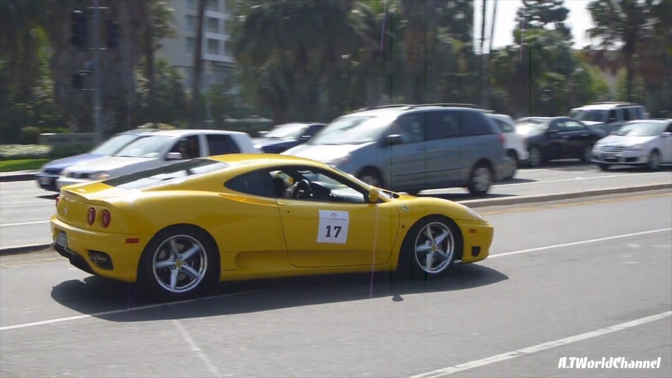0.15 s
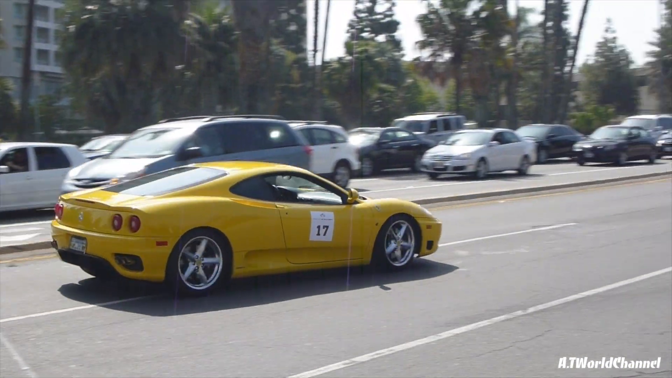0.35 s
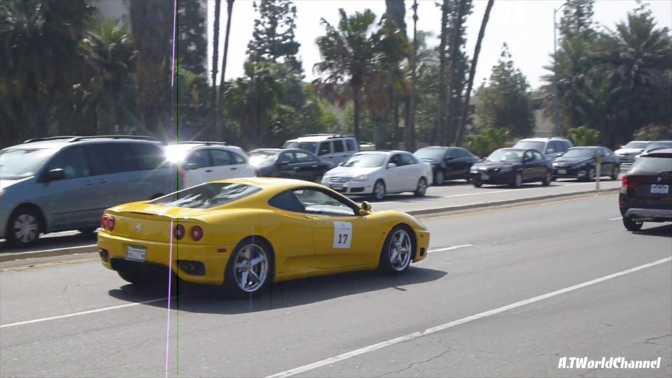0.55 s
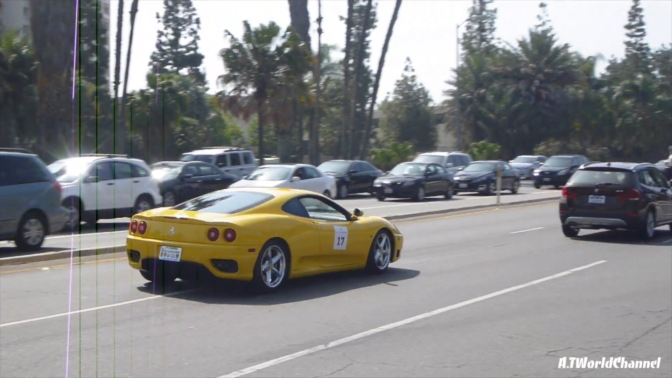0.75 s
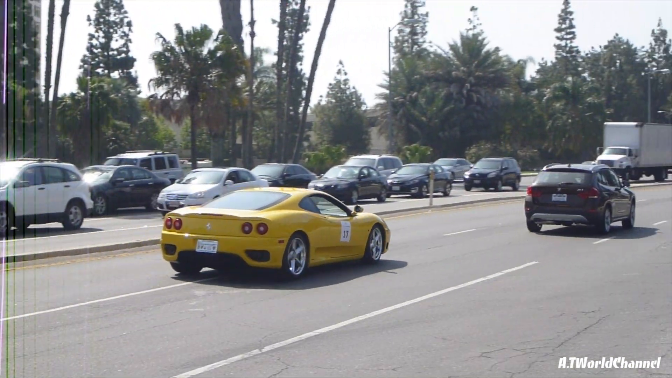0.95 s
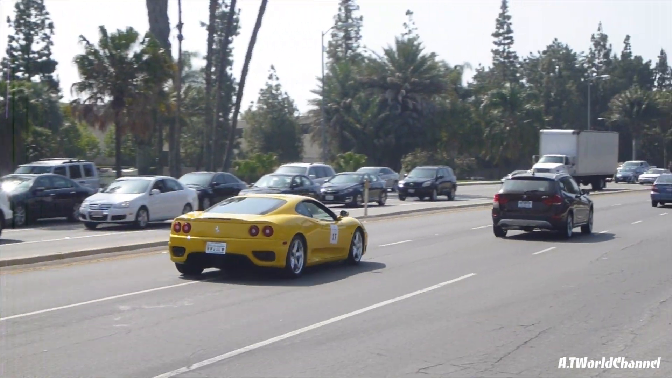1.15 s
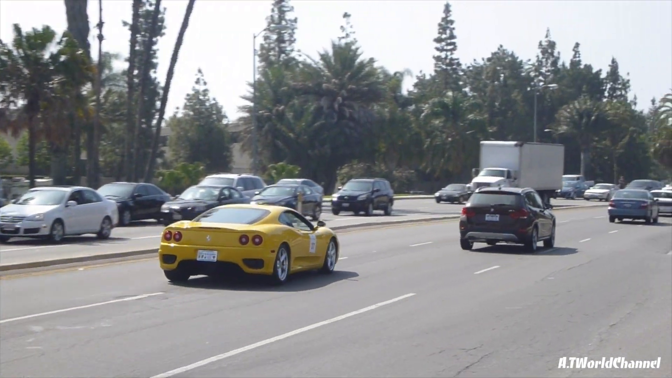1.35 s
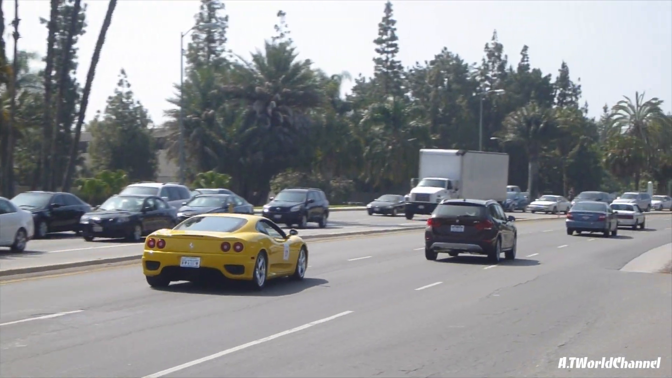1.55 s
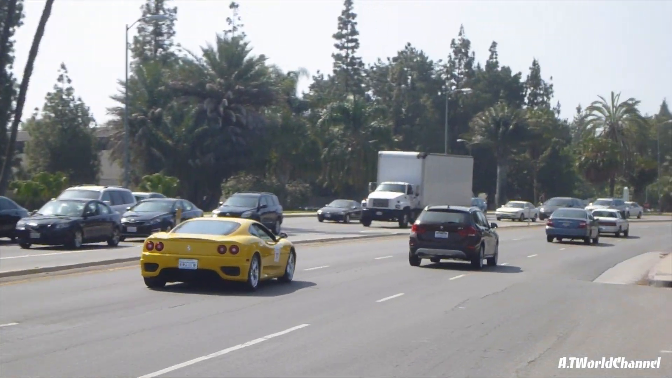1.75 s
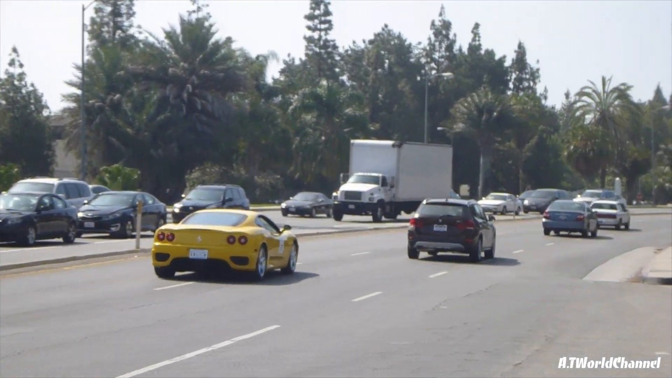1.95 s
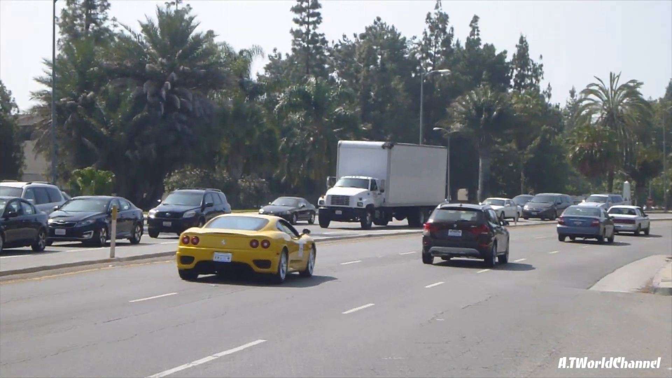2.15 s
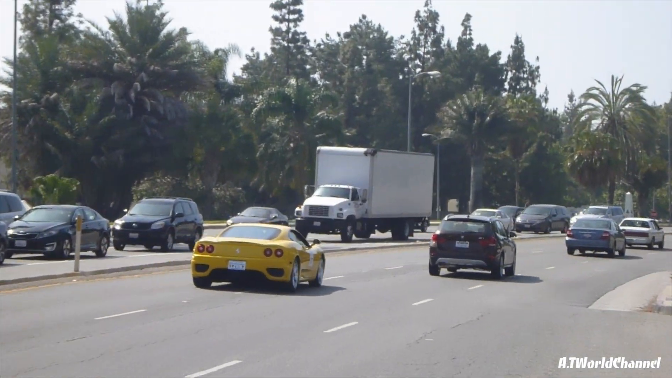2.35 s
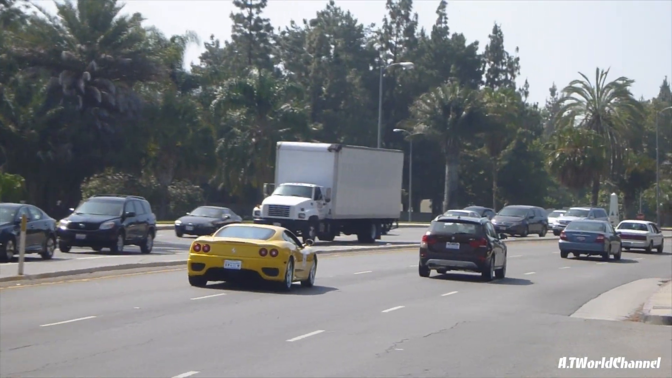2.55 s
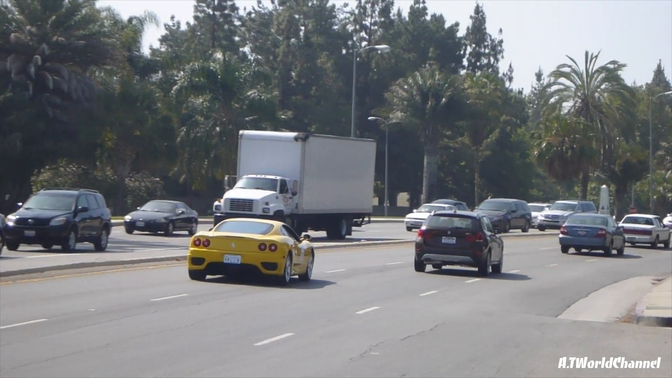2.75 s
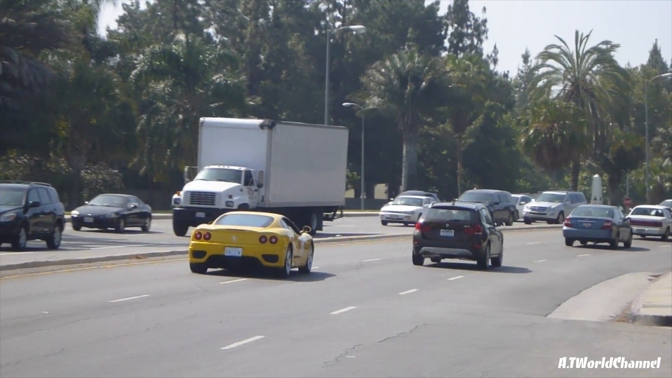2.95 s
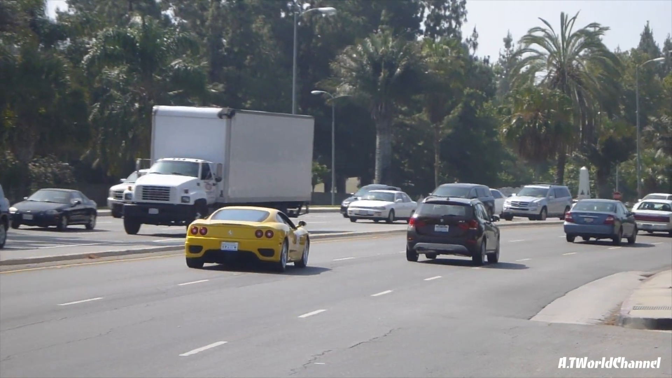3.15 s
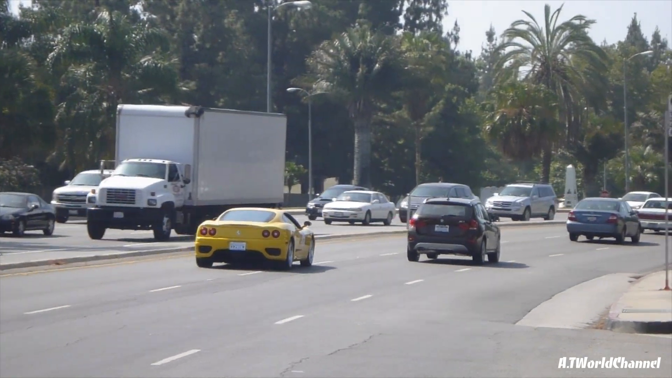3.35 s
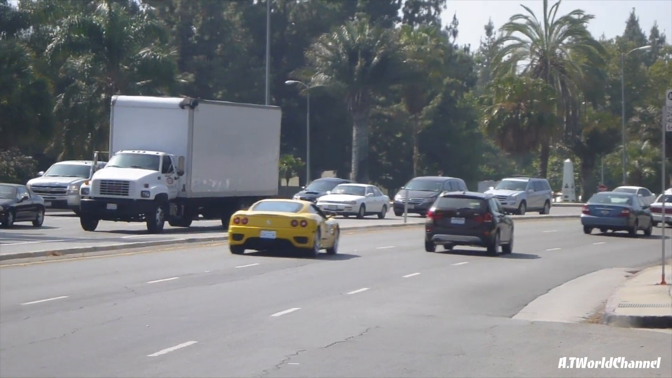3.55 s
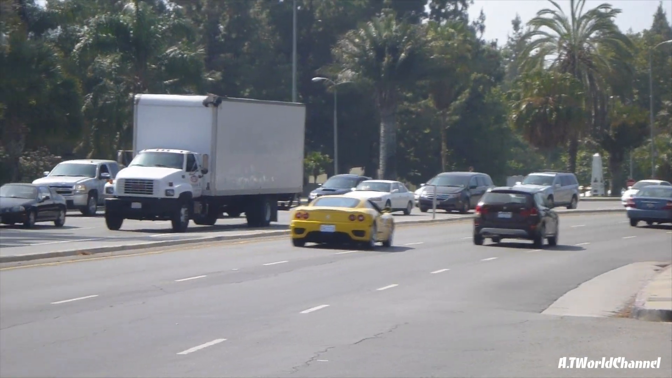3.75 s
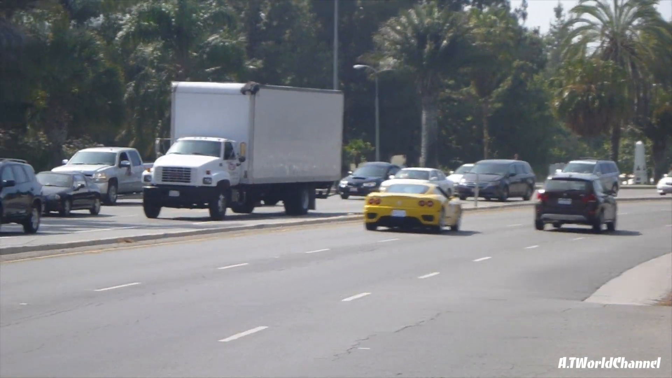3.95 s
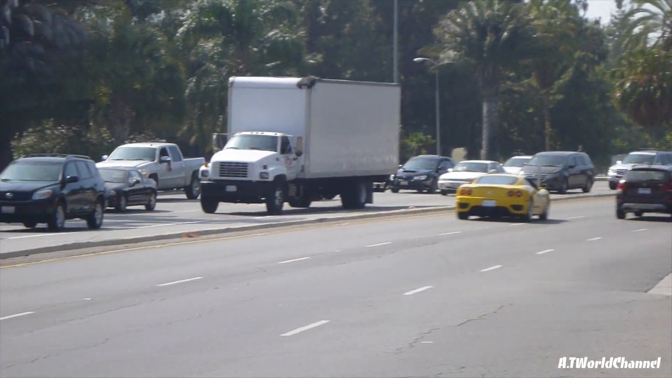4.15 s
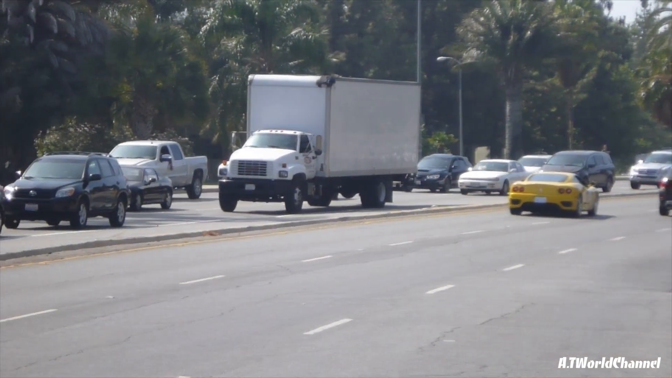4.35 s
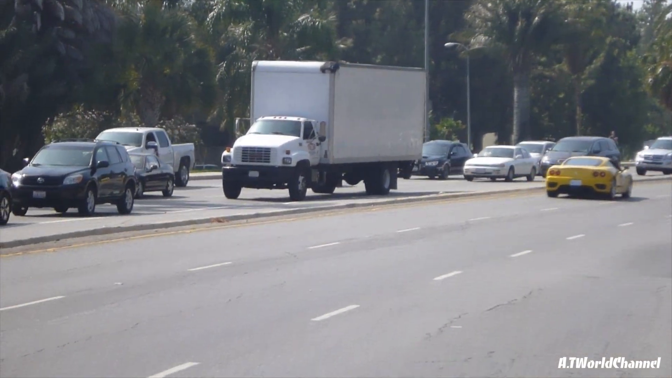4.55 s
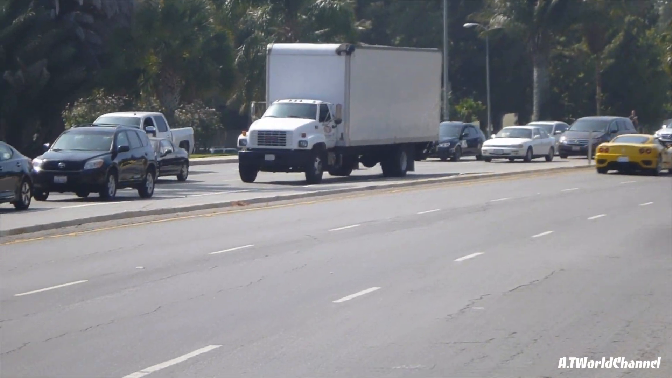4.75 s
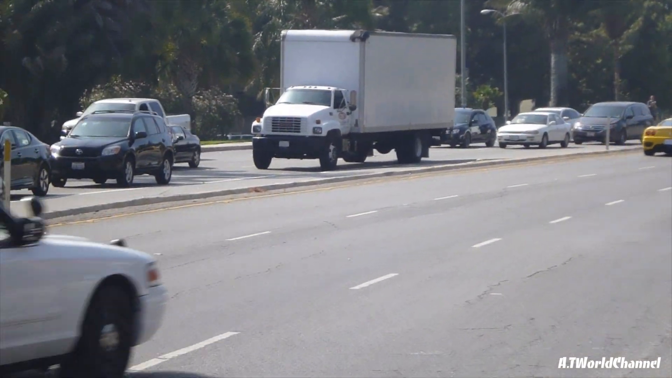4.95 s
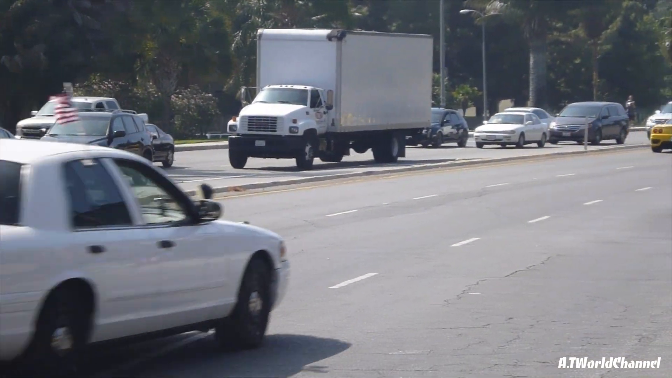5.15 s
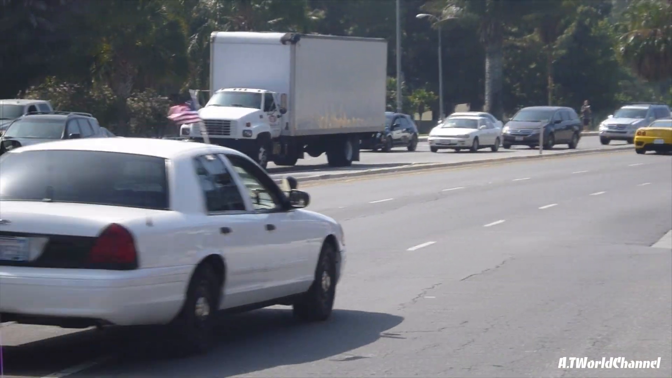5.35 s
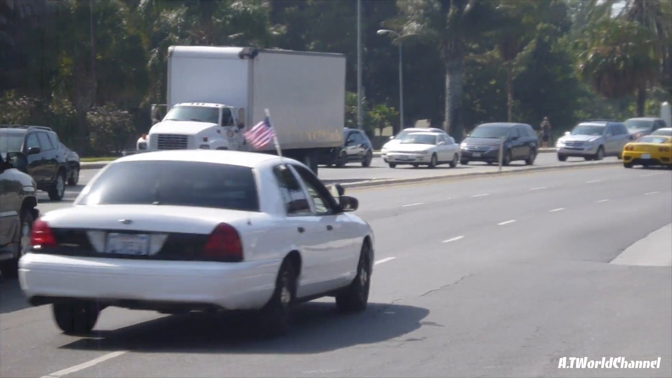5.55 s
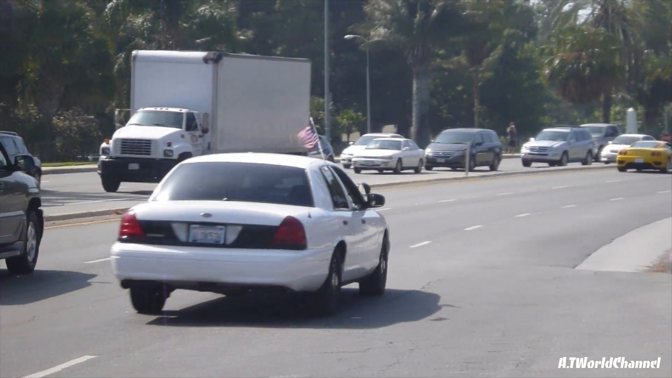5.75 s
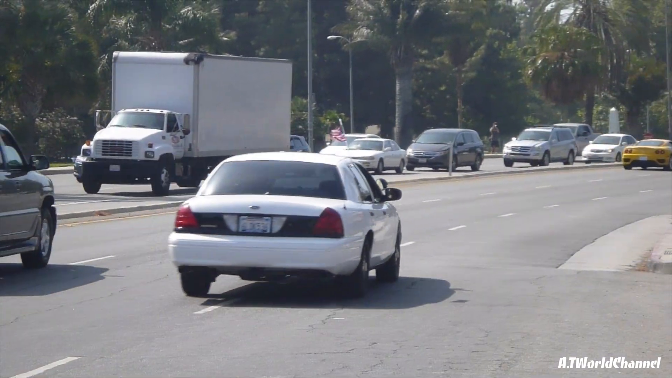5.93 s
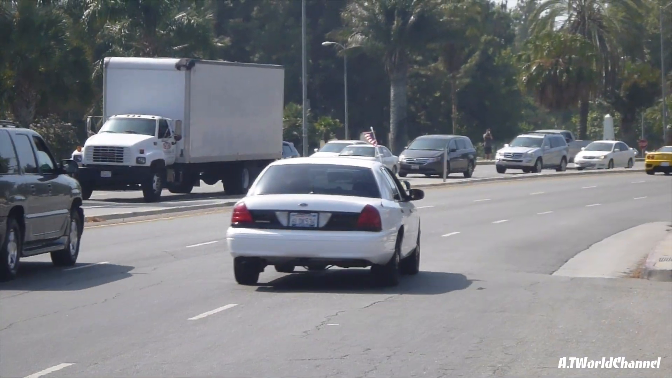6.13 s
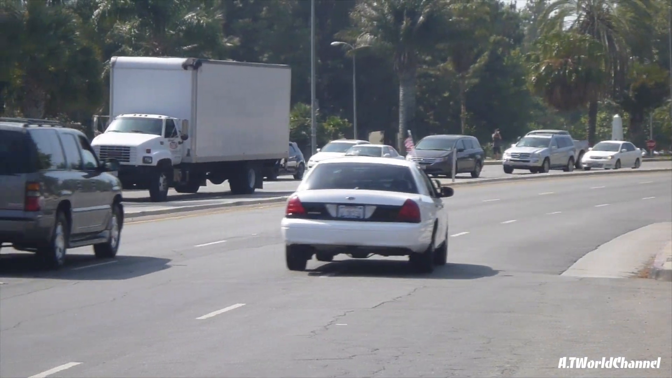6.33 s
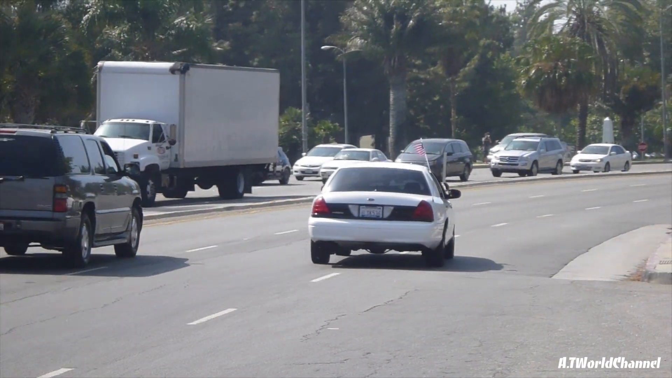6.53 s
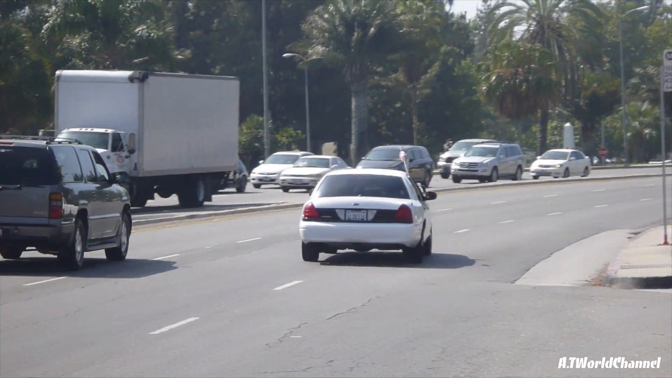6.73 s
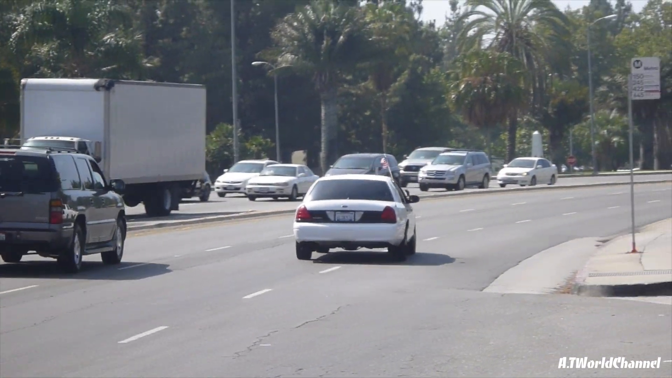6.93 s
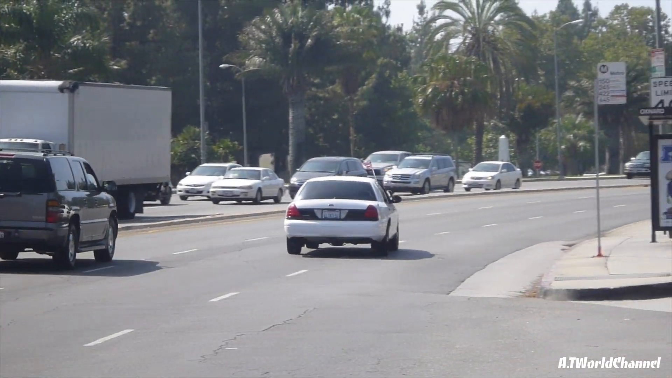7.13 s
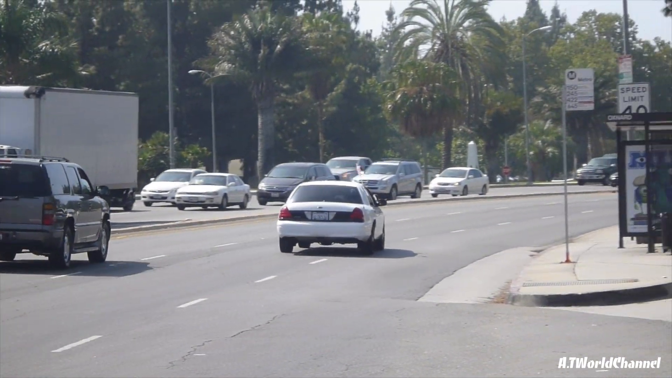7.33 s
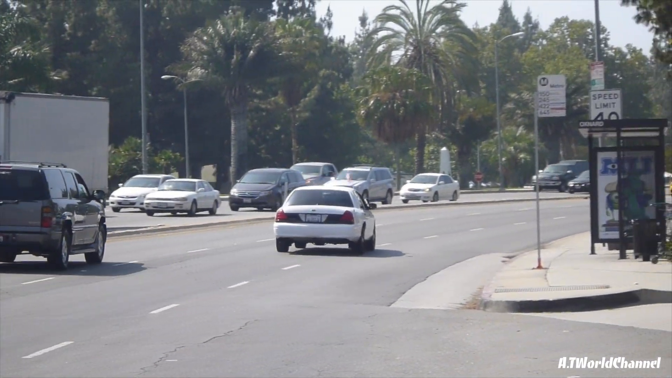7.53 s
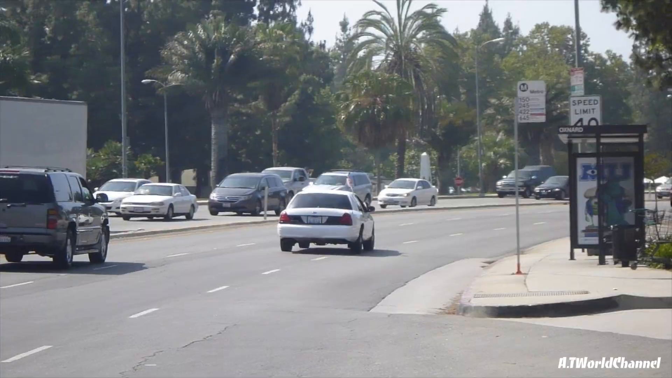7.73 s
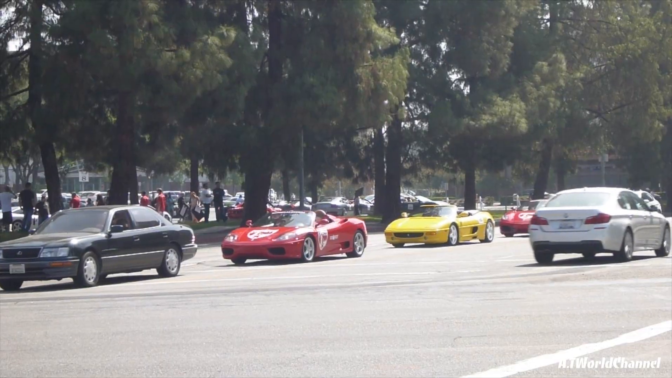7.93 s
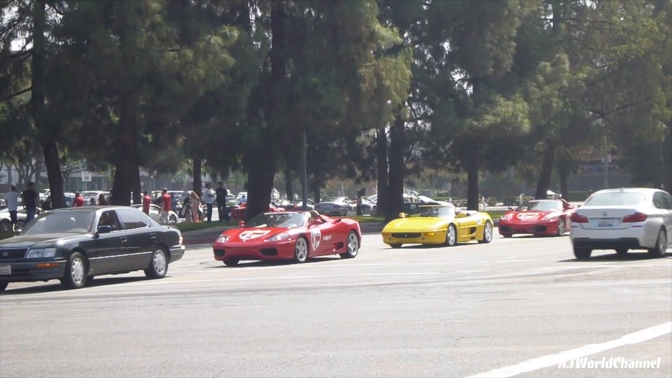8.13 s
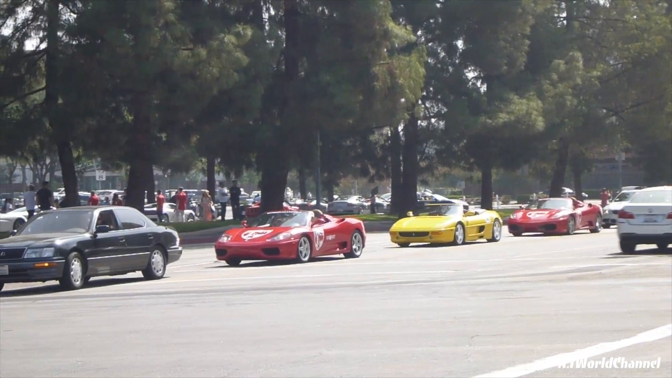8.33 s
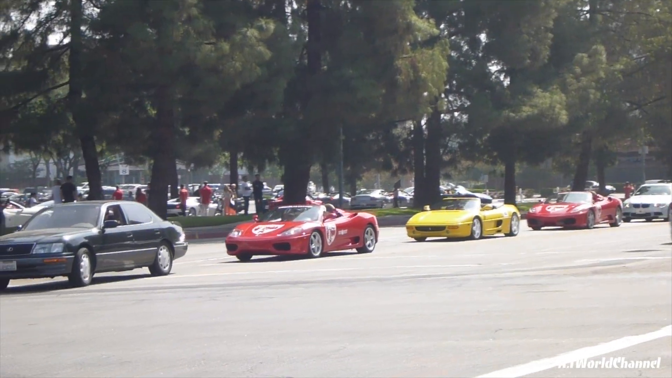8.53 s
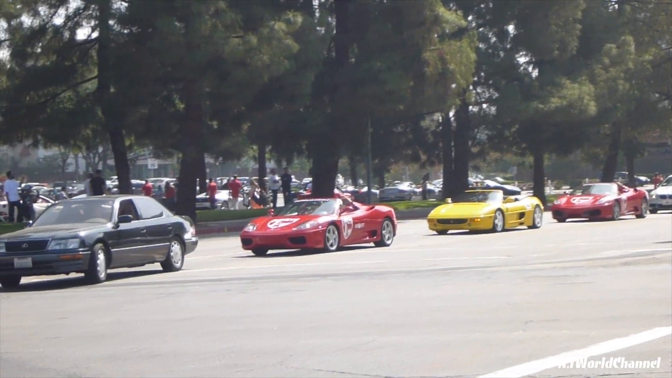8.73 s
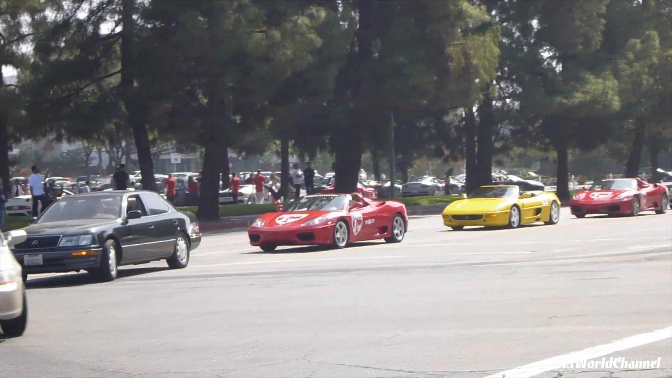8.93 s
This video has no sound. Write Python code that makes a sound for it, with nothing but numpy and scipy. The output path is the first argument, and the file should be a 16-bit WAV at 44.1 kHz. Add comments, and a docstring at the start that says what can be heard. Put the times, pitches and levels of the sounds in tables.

```python
"""A wide street at a junction: cars pull away and pass a camcorder, then a queue grumbles across the road. A
flat-plane V8 coupe winds up in first gear; a burbling cross-plane V8 changes up; a saloon and a last car
follow. Engines are sums of sinusoidal orders locked to a shaft angle; exhaust gas and tyres are coloured noise.
The passing cars have a diffuse street echo. After 33 ms of silence the scene changes to a queue of sports cars
at low revs."""
import sys
import numpy as np
from scipy import signal
from scipy.fft import rfft, irfft, next_fast_len
from scipy.io import wavfile
from scipy.ndimage import uniform_filter1d

SR = 44100
rng = np.random.default_rng(int(sys.argv[2]) if len(sys.argv) > 2 else 0)


def pcm_store(signal):
    """Save signal as 16-bit PCM."""
    levels = np.round(np.clip(np.atleast_2d(signal), -1, 1) * 32767)
    wavfile.write(sys.argv[1], SR, levels.astype(np.int16).T)


N = 396018
TIME = np.arange(N) / SR

# one long pull in first gear: [t/s, crankshaft f/Hz]
COUPE_REVS = [(0, 78.9), (.29, 85.4), (.37, 83.6), (.54, 87.5), (1.12, 97.2), (1.21, 101.4), (1.36, 103.2),
              (2.03, 121.2), (2.7, 136.9), (3.37, 153.4), (4.55, 174.5)]
# it opens up, then draws away: [t/s, strong-order level/dB, weak-order level/dB]
COUPE_LEVEL = [(0, -15, -30.5), (.3, -17, -31), (.9, -14, -25.5), (1.55, -14, -28), (2.0, -17, -23),
               (2.6, -14.5, -26.5), (3.15, -13.5, -27.5), (3.45, -21.5, -31), (3.95, -18.5, -38.5),
               (4.55, -25.5, -43.5)]
# strong orders: [multiple of the crankshaft rate, relative level/dB]
COUPE_ORDERS = [(2, 2.3), (3, -12.5), (4, 1.4), (5, -8.5), (6, -4), (7, -9.4)]
# exhaust resonances through which the strong orders sweep: [f/Hz, width/Hz, level/dB]
COUPE_MODES = [(165.1, 14, -9), (234, 18, -5), (266.5, 38, -0.4), (318.8, 31, 0.8), (375, 37, 2.5),
               (398, 28, 3), (451.6, 36, -0.6), (528, 55, -3.1), (576, 34, -4), (616.7, 51, 1.1),
               (648, 63, 4.5), (740, 51, -5.5), (818, 88, -2.8)]
# exhaust colour of the weak orders: [f/Hz, relative level/dB]
COUPE_PIPE = [(80, -20.5), (150, -12.5), (240, 6.5), (310, -8.5), (400, -1), (520, 11), (690, 7),
              (800, -2.5), (880, -3.5), (970, -10), (1080, -6), (1180, -2), (1290, -4), (1500, -16),
              (1900, -15.5), (3000, -25.5)]
# single orders howl out while the car is close: [t/s, multiple of the crankshaft rate, half length/s, boost/dB]
COUPE_HOWLS = [(0.3, 6, 0.12, 10), (0.565, 6, 0.21, 9.5), (0.549, 3, 0.48, 8.5), (.91, 5, .15, 11),
               (1.208, 6, 0.13, 7), (1.534, 6, 0.16, 7), (1.948, 7, 0.2, 6.5)]
# colour of the rasp: [f/Hz, relative level per Hz/dB]
COUPE_RASP = [(950, -20), (1130, -0.5), (1350, -1), (1600, -16), (1950, -7), (2250, -19.5), (3000, -38.5)]
RASP_DB, RASP_PULSING = -2.5, 0.2  # level over the weak orders; depth of the firing puffs
# the pipes turn away between these times and lose their top
LEAVING_S, DULL_ABOVE_HZ, DULL_DB_PER_OCTAVE = (3.07, 3.3), 340, 13


def coupe():
    """Order resonance: flat-plane V8 orders bloom at exhaust modes, over a pulsing rasp. Also gives its throb."""
    t = span(COUPE_REVS)
    crank_hz, = curves(COUPE_REVS, t)
    strong_db, weak_db = curves(COUPE_LEVEL, t)
    angle = crank(crank_hz, t, jitter=.0025)
    flutter_db = np.interp(t, [2.6, 3.4], [.9, 2.6])  # a far car flutters more
    dull_db = DULL_DB_PER_OCTAVE * np.interp(t, LEAVING_S, [0, 1])

    orders = np.zeros(len(t))
    for k, order_db in COUPE_ORDERS:
        order_hz = k * crank_hz
        howl_db = sum(db * bloom(t, s, half) for s, which, half, db in COUPE_HOWLS if which == k)
        loss_db = dull_db * np.log2(np.maximum(order_hz / DULL_ABOVE_HZ, 1))
        level_db = strong_db + order_db + howl_db - loss_db
        orders += resonances(COUPE_MODES, order_hz) * tone(angle, t, level_db, flutter_db, order=k)
    for k in [1, *range(8, 15)]:
        high_db = -5 if k > 8 else 0
        orders += overtone(angle, t, weak_db + high_db + along(COUPE_PIPE, k * crank_hz), order=k)

    throb = placed(np.cos(angle) + np.cos(2 * angle), t)
    puffs = 1 + RASP_PULSING * throb
    rasp = placed(amp(weak_db + RASP_DB), t) * puffs * rush(COUPE_RASP, patchy_db=-1.9)
    return placed(orders, t) + rasp, throb


# the clutch bites, it pulls, changes up and pulls again: [t/s, firing f/Hz]
BURBLER_REVS = [(3.1, 130.3), (3.4, 140.8), (3.77, 187.8), (4.35, 218), (4.9, 234.6), (5.75, 272.3),
                (6.38, 300), (6.85, 197.2), (7.78, 211.8)]
# its throttle: [t/s, firing-tone level/dB, uneven-beat level/dB]
BURBLER_LEVEL = [(3.1, -30, -40), (3.5, -24.5, -35), (3.8, -19.5, -32), (4.4, -20, -27.5),
                 (4.85, -20.5, -28.5), (5.4, -28, -28), (5.9, -17, -30.5), (6.3, -26, -28.5),
                 (6.6, -22.5, -35), (7.78, -30.5, -38.5)]
# exhaust colour: [f/Hz, relative level/dB]
BURBLER_PIPE = [(68, -27), (88, -13), (115, -20), (150, -8), (190, 0), (240, -4.5), (290, 2), (325, -3),
                (365, 5), (420, -18), (510, -9.5), (630, 0), (750, 3), (850, 3), (950, -22.5), (1600, -18)]
# strength of the cross-plane beat: [multiple of the four-stroke cycle rate, relative level/dB]
BURBLER_BEAT = [(3, 1), (4, -4.5), (5, -2.5), (6, 1.5), (7, 4), (9, 1.5), (10, -13), (12, 0.5), (13, 3.5),
                (14, -0.5), (15, -1.5), (16, 12), (17, 2.5), (18, -5), (19, 5), (20, 1.5), (21, -1.5),
                (22, -11), (24, 2), (25, -8), (27, -4), (30, -4), (37, 4.5)]
# the 11th multiple growls out of the beat: [t/s, half length/s, boost/dB]
BURBLER_GROWLS = [(4.45, 0.14, 8), (5.197, .12, 4.5), (5.597, 0.12, 6.5)]
# in mid pull the firing tone swells and sinks slowly
SURGE_S, SURGE_PERIOD_S, SURGE_SPREAD_S, SURGE_DB = 4.57, .315, 0.84, 4
# the car is dull until it comes near
BURBLER_NEAR_S, BURBLER_DULL_ABOVE_HZ, BURBLER_DULL_DB_PER_OCTAVE = (3.74, 5.64), 295, 3
BRIGHT_DB_PER_OCTAVE = -0.4  # tilt of its pipe


def burbler():
    """Subharmonic excitation: uneven bank firing sounds multiples of the cycle rate. Also gives its throb."""
    t = span(BURBLER_REVS)
    firing_hz, = curves(BURBLER_REVS, t)
    firing_db, beat_db = curves(BURBLER_LEVEL, t)
    surge = np.cos(2 * np.pi * (t - SURGE_S) / SURGE_PERIOD_S)
    surge_db = SURGE_DB * surge * bloom(t, SURGE_S, SURGE_SPREAD_S)
    growl_db = sum(db * bloom(t, s, half) for s, half, db in BURBLER_GROWLS)
    dull_db = BURBLER_DULL_DB_PER_OCTAVE * np.interp(t, BURBLER_NEAR_S, [1, 0])
    cycle_hz = firing_hz / 8  # eight firings a cycle
    angle = crank(cycle_hz, t, jitter=.003)

    x = tone(angle, t, firing_db + surge_db, flutter_db=1.3, order=8)
    growl_level_db = beat_db + growl_db + along(BURBLER_PIPE, 11 * cycle_hz)
    x += tone(angle, t, growl_level_db, flutter_db=1.6, order=11)
    for k in [*range(3, 8), *range(9, 11), *range(12, 32)]:
        order_hz = k * cycle_hz
        pipe_db = along(BURBLER_PIPE, order_hz) + BRIGHT_DB_PER_OCTAVE * np.log2(order_hz / 400)
        pipe_db -= dull_db * np.log2(np.maximum(order_hz / BURBLER_DULL_ABOVE_HZ, 1))
        lag = .13 * k  # the pipe spreads each beat into a short rattle
        x += overtone(angle - lag, t, beat_db - 1.5 + pipe_db + along(BURBLER_BEAT, k), order=k)
    throb = placed(np.cos(angle) + np.cos(3 * angle), t)
    return placed(x, t), throb


# nearly steady revs: [t/s, crankshaft f/Hz, firing-tone level/dB]
SALOON_DRIVE = [(4.9, 59.3, -44.5), (5.3, 62.9, -28), (6.0, 67.2, -35.5), (6.6, 68.43, -26.5),
                (7.78, 70.15, -30)]


def saloon():
    """Harmonic drone: an automatic at nearly steady revs sounds its firing order with a few other orders."""
    t = span(SALOON_DRIVE)
    crank_hz, firing_db = curves(SALOON_DRIVE, t)
    angle = crank(crank_hz, t, jitter=0.0029)
    orders, levels_db = (2, 3, 4, 5, 6, 8, 12), (-12, -9, 0, -5, -7, -1, -5)
    x = sum(tone(angle, t, firing_db + d, flutter_db=0.5, order=k) for k, d in zip(orders, levels_db))
    return placed(x, t)


# a steady pull: [t/s, crankshaft f/Hz, level/dB]
CHASER_DRIVE = [(6.5, 65.5, -22.5), (6.85, 72.94, -20), (7.28, 79.9, -16.5), (7.78, 90, -15.5)]
# exhaust colour: [f/Hz, relative level/dB]
CHASER_PIPE = [(210, -4.5), (285, -14), (325, -3), (450, 0)]


def chaser():
    """Rising order spectrum: the last car winds up with three strong orders and a weak higher tail."""
    t = span(CHASER_DRIVE)
    crank_hz, level_db = curves(CHASER_DRIVE, t)
    angle = crank(crank_hz, t, jitter=.007)
    x = np.zeros(len(t))
    for k in range(3, 6):
        x += tone(angle, t, level_db + along(CHASER_PIPE, k * crank_hz), flutter_db=1.5, order=k)
    for k in range(6, 11):
        x += overtone(angle, t, level_db - 19, order=k)
    return placed(x, t)


# creeping forward: [t/s, crankshaft f/Hz of the faster engine, exhaust level/dB between dabs of throttle]
QUEUE_DRIVE = [(7.8, 29.3, -24), (8.98, 31.82, -34)]
# exhaust colour: [f/Hz, relative level/dB]
QUEUE_PIPE = [(60, -37), (120, -7.5), (200, -14.5), (295, 3), (340, -14), (385, 0.5), (480, -9), (900, -11),
              (1500, -30)]
# dabs of throttle: [t/s, half length/s, level/dB]
QUEUE_BLIPS = [(8.33, .09, -29.5), (8.6, 0.061, -25), (8.82, 0.048, -20), (8.97, 0.046, -19.5)]


def queue():
    """Beating: two engines at different low revs interfere; dabs of throttle add to the level in power."""
    t = span(QUEUE_DRIVE)
    crank_hz, exhaust_db = curves(QUEUE_DRIVE, t)
    x = np.zeros(len(t))
    for revs in (1, .79):
        wandering_hz = revs * crank_hz * (1 + .015 * wobble(5.4, t))
        angle = crank(wandering_hz, t, jitter=.018)
        for k in range(3, 18):
            x += tone(angle, t, along(QUEUE_PIPE, k * revs * crank_hz), flutter_db=7.5, order=k)
    blip_power = sum((amp(db) * swell(t, s, half)) ** 2 for s, half, db in QUEUE_BLIPS)
    level = np.sqrt(amp(exhaust_db) ** 2 + blip_power)
    return placed(level * unit(x), t)


# gas and its street echo while a car is on the throttle: [start t/s, end t/s, boom level/dB, roar level/dB]
GAS_BLASTS = [(-.2, 0.597, -25, -22), (.6, 2.204, -25.5, -18), (2.186, 4.001, -25, -21),
              (4.002, 5.15, -30.5, -22.5), (5.15, 5.85, -25, -25.5), (5.857, 6.89, -22.5, -19.5),
              (6.901, 8, -21.5, -23.5)]
# colour of the low boom: [f/Hz, relative level per Hz/dB]
BOOM_COLOUR = [(25, -50.5), (50, -27), (80, -15.5), (115, -12.5), (190, -3.5), (330, 1.5), (430, 3),
               (600, -12.5), (1200, -45)]
# colour of the roar: [f/Hz, relative level per Hz/dB]
ROAR_COLOUR = [(200, -34), (400, -11), (500, -1.5), (640, 3), (820, -2), (960, -9.5), (1300, -31),
               (3000, -69)]
BLAST_EDGE_S = .09  # time constant of the throttle opening or shutting


def exhaust_gas(throb):
    """Turbulence noise: a low boom, and a roar amplitude-modulated into puffs in step with the engines."""
    boom, roar = np.zeros((2, N))
    for start, end, boom_db, roar_db in GAS_BLASTS:
        opened = np.tanh((TIME - start) / BLAST_EDGE_S)
        shut = np.tanh((TIME - end) / BLAST_EDGE_S)
        throttle = (opened - shut) / 2
        boom += amp(boom_db) * throttle
        roar += amp(roar_db) * throttle
    puffs = unit(rush(ROAR_COLOUR, patchy_db=2.2) * (1 + .25 * throb))
    return boom * rush(BOOM_COLOUR, patchy_db=1.8) + roar * puffs


# tyre noise and rasp swell as each car goes by: [t/s, half length/s, tread level/dB, hiss level/dB]
CAR_PASSES = [(0.802, .25, -27, -41.5), (2.187, 0.36, -22.5, -40.5), (3.17, 0.27, -28.5, -47.5),
              (4.085, 0.37, -23, -41.5), (4.866, 0.11, -27, -45), (5.709, 0.65, -21.5, -37),
              (6.45, 0.36, -21.5, -35), (7.65, 0.49, -23.5, -39)]
# colour of the tread roar: [f/Hz, relative level per Hz/dB]
TREAD_COLOUR = [(500, -36.5), (850, 3), (1000, -0.5), (1220, 2), (1520, -5), (1820, -2.5), (2150, -10),
                (2500, -7.5), (2750, -13.5), (3300, -32.5), (5000, -60)]
# colour of the hiss, near or far: [f/Hz, relative level per Hz/dB]
HISS_COLOUR = [(1800, -32.5), (2700, -1.5), (3200, 3.5), (3800, 2), (4500, -5), (5500, -11.5),
               (6300, -15.5), (7200, -19)]
STREET_TREAD_DB, STREET_HISS_DB = -32, -48.5  # the traffic farther off


def rasp_and_tyres(throb):
    """Incoherent summation: tread roar and hiss of passing cars add in power, with pulsing exhaust rasp."""
    tread, hiss = amp(STREET_TREAD_DB), amp(STREET_HISS_DB)
    for s, half, tread_db, hiss_db in CAR_PASSES:
        near = swell(TIME, s, half)
        tread = np.hypot(tread, amp(tread_db) * near)
        hiss = np.hypot(hiss, amp(hiss_db) * near)
    grit = unit(amp(.4 * wobble(35, TIME)) * (1 + .09 * throb))
    return grit * (tread * rush(TREAD_COLOUR, patchy_db=1.0) + hiss * rush(HISS_COLOUR, patchy_db=1.47))


# rises late and stays under the queue: [t/s, fizz level/dB]
FIZZ_LEVEL = [(4.6, -58.5), (5.4, -38.5), (6.2, -34.5), (6.8, -34.5), (7.3, -39), (7.78, -35.5), (8.2, -39),
              (8.98, -42)]
# colour of the fizz: [f/Hz, relative level per Hz/dB]
FIZZ_COLOUR = [(1700, -14), (2450, 12.5), (2800, 6.5), (3400, -12), (4500, -2), (5500, -3), (6500, -11),
               (7500, -1)]


def fizz():
    """Band-shaped noise: a bright tyre fizz, strongest near 2.5 kHz, rises late and stays under the queue."""
    fizz_db, = curves(FIZZ_LEVEL, TIME)
    return amp(fizz_db) * rush(FIZZ_COLOUR, patchy_db=1)


# traffic around the queue: [t/s, body level/dB, hiss level/dB]
FAR_LEVEL = [(7.86, -16.5, -37), (8.45, -18, -39.5), (8.94, -20, -42.5)]
# colour of its body: [f/Hz, relative level per Hz/dB]
FAR_COLOUR = [(30, -26), (64, -19), (90, -13), (125, -1.5), (200, -3.5), (350, 4), (520, -3.5), (650, 1),
              (900, 1.5), (1030, -2), (1200, -1.5), (1550, -6), (2500, -16.5), (3300, -37)]


def far_traffic():
    """Broadband superposition: traffic around the queue is a wash of low body noise and hiss."""
    body_db, hiss_db = curves(FAR_LEVEL, TIME)
    body = amp(body_db) * rush(FAR_COLOUR, patchy_db=0.1)
    return body + amp(hiss_db) * rush(HISS_COLOUR, patchy_db=3.0)


def street(x):
    """Diffuse scattering: trees and parked cars return a short echo, decaying 60 dB in 0.61 s."""
    t = np.arange(SR // 2) / SR
    tail = rng.standard_normal(len(t)) * amp(-60 * t / 0.61) * (t > .02)
    return signal.fftconvolve(x, tail / np.linalg.norm(tail))[:N]


def crank(hz, t, jitter):
    """Phase integration: shaft angle is summed speed, which trembles with uneven combustion."""
    return 2 * np.pi * np.cumsum(hz * (1 + jitter * wobble(70, t))) / SR


def tone(angle, t, db, flutter_db, order):
    """Multipath fading: shifting paths over the road make an engine order flutter; uneven firings roughen it."""
    level = amp(db + flutter_db * wobble(rng.uniform(10, 30), t))
    rough = 1 + .08 * wobble(110, t)
    return np.sqrt(2) * level * rough * np.sin(order * angle + rng.uniform(0, 2 * np.pi))


def overtone(angle, t, db, order):
    """Partial coherence: weak orders fade independently but stay loosely aligned in phase,
    so together they pulse once per turn of the angle."""
    level = amp(db + 3.5 * wobble(3, t) + 1.8 * wobble(25, t))
    scatter = .9 * wobble(rng.uniform(12, 24), t)
    return np.sqrt(2) * level * np.cos(order * angle + scatter)


def resonances(modes, hz):
    """Modal summation: power sum of resonance gains at hz, each with its full width at half amplitude."""
    gains = [amp(db) / (1 + ((hz - centre) / width * 2) ** 2) for centre, width, db in modes]
    return np.sqrt(sum(gain ** 2 for gain in gains))


def swell(t, middle, half):
    """Inverse distance law: gain of something that goes by, 1 when nearest."""
    return 1 / np.hypot(1, (t - middle) / half)


def bloom(t, middle, half):
    """Gaussian envelope: a bell-shaped rise and fall, 1 at the middle."""
    return np.exp(-((t - middle) / half) ** 2)


def rush(colour, patchy_db):
    """Filtered noise: coloured noise of rms 1 with time-frequency patches of random gain."""
    z = signal.stft(rng.standard_normal(N), nperseg=1024)[2]
    field = uniform_filter1d(rng.standard_normal(z.shape), size=6, axis=0)
    field = uniform_filter1d(field, size=7, axis=1)
    patchy = signal.istft(z * amp(patchy_db * unit(field)), nperseg=1024)[1][:N]
    top_hz = colour[-1][0]
    return unit(filtered(patchy, lambda hz: amp(along(colour, hz)) / (1 + (hz / top_hz) ** 16)))


def filtered(x, response):
    """Linear filtering: the spectrum of x times a response of frequency."""
    m = next_fast_len(N + SR // 2)
    return irfft(rfft(x, m) * response(np.fft.rfftfreq(m, 1 / SR)), m)[:N]


def wobble(rate, t):
    """Random modulation: a curve joining normal random knots, rate of them a second."""
    knots = rng.standard_normal(4096)
    return np.interp(t * rate, np.arange(len(knots)), knots)


def amp(db):
    """Level law: decibels to amplitude gain."""
    return 10 ** (np.asarray(db) / 20)


def unit(x):
    """Normalization: scale to rms 1."""
    return x / np.sqrt(np.mean(x ** 2) + 1e-20)


def along(points, hz):
    """Log-axis interpolation: (frequency or multiple, value) points read at hz."""
    f, v = np.transpose(points)
    return np.interp(np.log(hz + 1), np.log(f + 1), v)


def curves(rows, t):
    """Linear interpolation: each column after the time, read at the times t."""
    s, *cols = np.transpose(rows)
    return [np.interp(t, s, c) for c in cols]


def span(rows):
    """Sampling: the sample times that a table covers."""
    return TIME[(TIME >= rows[0][0]) & (TIME <= rows[-1][0])]


def placed(x, t):
    """Windowing: a sound set at times t, with no fade-in if it starts before 0.1 s, no fade-out if it ends after 7 s."""
    fade_in = np.interp(t, [t[0], t[0] + .12], [t[0] < .1, 1])
    fade_out = np.interp(t, [t[-1] - .12, t[-1]], [1, t[-1] > 7])
    return np.interp(TIME, t, x * (fade_in * fade_out), left=0, right=0)


BREAK_START_S, BREAK_END_S = 7.782, 7.815


def scene():
    """Superposition: the passing cars, then after a brief silence the scene changes to the queue."""
    first, first_throb = coupe()
    second, second_throb = burbler()
    engines = first + second + saloon() + chaser()
    throb = first_throb + second_throb
    echo = amp(-15.5) * street(engines)
    passing = engines + echo + exhaust_gas(throb) + rasp_and_tyres(throb)
    waiting = queue() + far_traffic()
    before, after = TIME < BREAK_START_S, TIME > BREAK_END_S
    return (passing * before + waiting * after + fizz() * (before | after))[None]


BAND_HZ, TOP_HZ = 6750, 16000  # steep band edge before clipping; cutoff after it


def record(dry):
    """Band limiting and clipping: a camcorder cuts the bass, notches the treble and clips peaks beyond 1."""
    notch = lambda hz: (hz - 2900) / (hz - 2900 - 75j)
    bass_cut = lambda hz: hz ** 2 / np.sqrt(hz ** 4 + 42 ** 4)
    band = lambda hz: 1 / np.sqrt(1 + (hz / BAND_HZ) ** 70)
    narrow = filtered(dry[0], lambda hz: bass_cut(hz) * notch(hz) * band(hz))
    return filtered(np.clip(narrow, -1, 1), lambda hz: hz < TOP_HZ)[None]


dry = scene()
out = record(dry)
pcm_store(out)
```